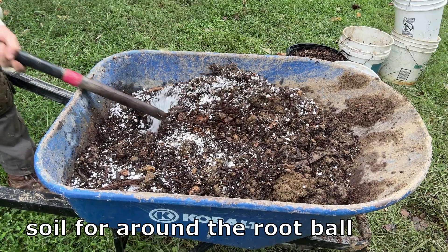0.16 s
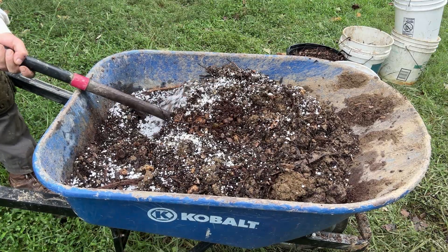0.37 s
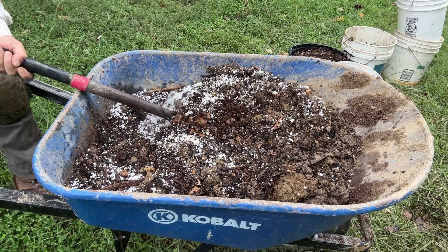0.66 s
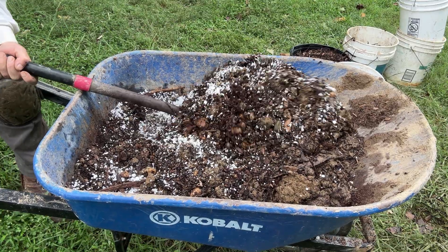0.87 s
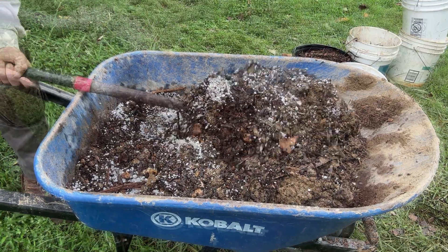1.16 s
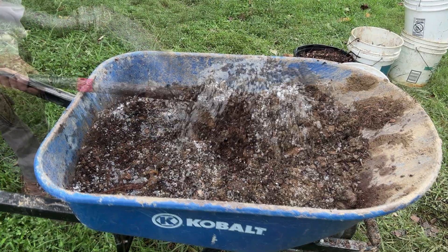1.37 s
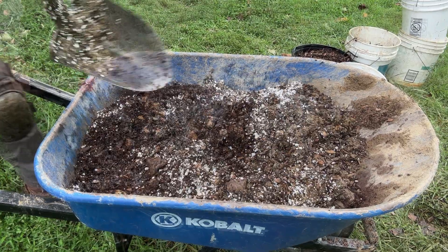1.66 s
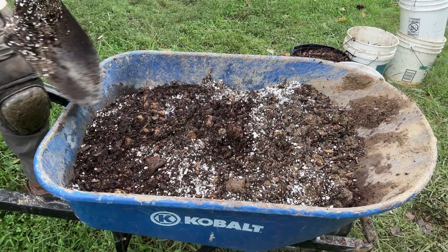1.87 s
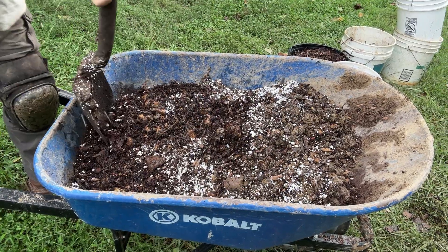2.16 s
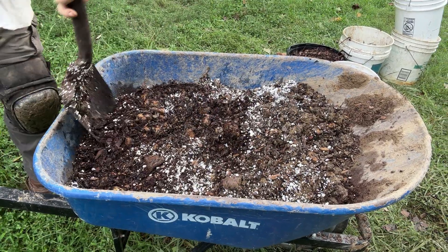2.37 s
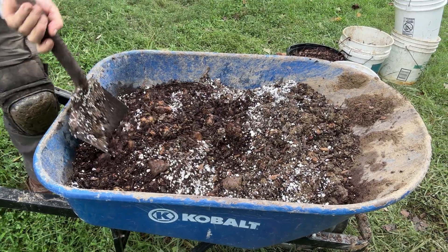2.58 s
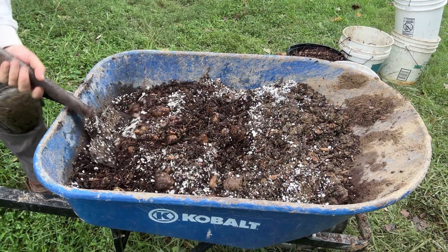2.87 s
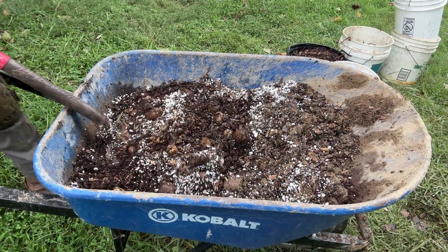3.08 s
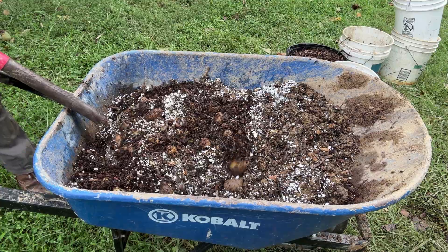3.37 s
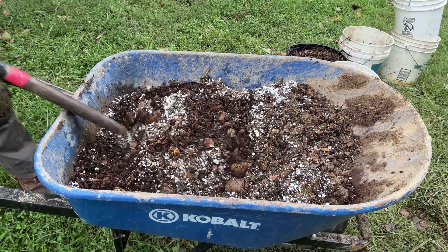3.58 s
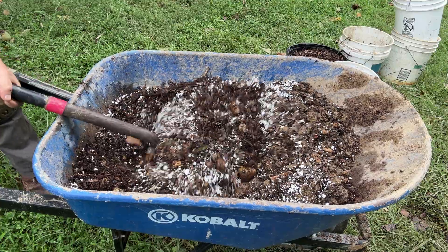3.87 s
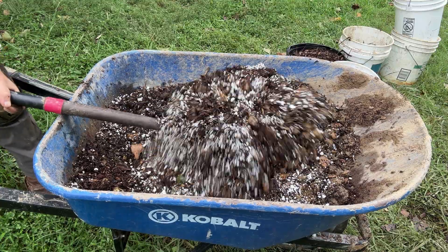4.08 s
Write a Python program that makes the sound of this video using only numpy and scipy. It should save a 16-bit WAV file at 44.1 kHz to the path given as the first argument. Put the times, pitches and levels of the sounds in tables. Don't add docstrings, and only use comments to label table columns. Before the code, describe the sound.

A steel shovel shoves gritty soil in a metal wheelbarrow, loud scrapes and stony clanks with dull tub thumps between quiet outdoor lulls.

```python
import sys
import numpy as np
from scipy import signal
from scipy.fft import rfft, irfft, next_fast_len
from scipy.io import wavfile
from scipy.ndimage import uniform_filter1d, map_coordinates

SR = 44100
rng = np.random.default_rng(int(sys.argv[2]) if len(sys.argv) > 2 else 0)


def boost_factor(decibels):
    exponent = np.asarray(decibels, float) / 20
    return 10 ** exponent


def wrap_up_sound(samples):
    columns = np.atleast_2d(samples).T
    tamed = np.clip(columns, -1, 1)
    steps = np.round(tamed * 32767).astype(np.int16)
    wavfile.write(sys.argv[1], SR, steps)


N = 185837

# (centre [Hz], width [Hz], level [dB])
BLADE_MODES = [(395, 65, -2), (549, 92, 0), (794, 173, -4), (1034, 126, -3), (1240, 246, -5),
               (1567, 204, -5), (1730, 93, -2), (1954, 410, -6.5), (2347, 540, -9), (3190, 670, -13.5),
               (3880, 350, -15)]
# (frequency [Hz], level [dB per Hz])
GRIT_COLOUR = [(1200, -1.5), (2200, -3.5), (4500, 2.5), (6200, 2), (8000, -1), (10300, -6.5), (12500, -1.5),
               (14500, -4), (16000, -18.5)]
# (time [s], centre [Hz], lift [dB])
CONTACT_PATH = [(0, 559, 5), (.15, 477, -11.5), (.3, 488, -8.5), (.7, 1326, -0.5), (1.45, 996, -0.5),
                (2.0, 1455, -1), (2.45, 1500, 2), (2.85, 1860, -1.5), (3.1, 1390, 6.5), (3.5, 1094, 7),
                (3.7, 1110, 5), (3.85, 1110, -4.5), (4.2, 1085, 1)]


def blade_motion():
    # (time [s], grit sliding [dB], load on the blade [dB])
    first_push = [
        (0.0, -31.5, -8.5),
        (0.054, -23.5, -16.5),
        (0.124, -39, -27.5),
        (0.18, -23, -19),
        (0.266, -47, -34.5),
        (0.34, -53, -56.5),
    ]
    lift = [
        (0.34, -50, -52),
        (0.48, -49, -63),
        (0.62, -48.5, -48),
        (0.818, -45.5, -39.5),
        (0.852, -46.5, -47),
        (1.12, -48, -44.5),
        (1.13, -47.5, -38),
        (1.398, -47.5, -40.5),
        (1.448, -47, -47.5),
    ]
    scoop = [
        (2.409, -51, -38),
        (2.417, -27, -21.5),
        (2.521, -32.5, -28),
        (2.603, -44.5, -32),
        (2.761, -34.5, -25),
        (2.809, -42, -28),
        (2.825, -27, -24.5),
        (2.981, -48, -27),
        (3.053, -52, -58),
    ]
    second_push = [
        (3.433, -66, -48),
        (3.445, -40, -34),
        (3.483, -48, -26.5),
        (3.545, -35, -26),
        (3.557, -50.5, -15.5),
        (3.65, -42.5, -24.5),
        (3.7, -34.5, -20),
        (3.76, -42, -27),
        (3.901, -48.5, -37.5),
    ]
    # (peak time [s], rise [s], hold [s], sliding [dB], load [dB])
    brushes = [(1.492, .04, 0.077, -48, -74), (1.6, .02, 0.023, -58, -59), (1.753, .09, 0.043, -61, -68),
               (1.966, 0.0092, 0.0022, -39, -22), (2.087, 0.054, 0.027, -34, -32.5),
               (2.152, .015, 0.0091, -53, -61), (2.302, 0.13, 0.035, -54, -58),
               (2.345, 0.012, 0.056, -41, -36.5), (3.078, .004, 0.07, -47.5, -37.5),
               (3.241, 0.078, 0.12, -51, -72), (3.424, .08, .02, -59, -47.5),
               (3.912, 0.037, 0.13, -45.5, -44.5), (4.038, .06, .12, -45.5, -45.5),
               (4.15, .008, .07, -43.5, -36)]
    rise_db, sag_db_per_s, release_db_per_s = 21, 31, 612
    rest_sliding_db, rest_load_db = -98, -64
    t = np.arange(N) / SR
    motion = np.outer((rest_sliding_db, rest_load_db), np.ones(N))
    for rows in (first_push, lift, scoop, second_push):
        inside = (t >= rows[0][0]) & (t <= rows[-1][0])
        motion = np.where(inside, curves([rows]), motion)
    for s, rise, hold, *peaks_db in brushes:
        sag_db = sag_db_per_s * np.clip(t - s, 0, hold)
        release_db = release_db_per_s * np.maximum(t - s - hold, 0)
        drop_db = rise_db * np.maximum(s - t, 0) / rise + sag_db + release_db
        motion = np.maximum(motion, np.array(peaks_db)[:, None] - drop_db)
    return motion


def stroke():
    # (centre [Hz], width [Hz], level [dB])
    tub_modes = [(141.5, 34, -4.5), (183, 48.5, -0.5), (236.4, 40, -3), (281, 43, -6.5), (358, 124, -15)]
    fine_db, rasp_db = blade_motion()
    coarse_db = -6.5 + fine_db + 0.49 * (rasp_db - fine_db)
    rumble_lag_s = 0.013
    keep = np.exp(-1 / (rumble_lag_s * SR))
    slow_load_db = rasp_db[0] + signal.lfilter([1 - keep], [1, -keep], rasp_db - rasp_db[0])
    rumble_db = -16 + 0.68 * slow_load_db

    clump = wobble(45)
    grit = patchy(grains(4000, spread_db=4.5, smooth=0.96), depth_db=2.0, shape=(12, 3))
    force = np.clip((coarse_db + 54) / 14, 0, 1)
    wash = np.std(grit) * rng.standard_normal((2, N))
    grit = force * grit + np.sqrt(1 - force ** 2) * wash
    hiss = boost_factor(fine_db) * unit(filtered(grit, bright)) + boost_factor(coarse_db + 1.5) * unit(filtered(grit, dull))

    crumbs = patchy(grains(1200, spread_db=2.5, smooth=1.0), depth_db=3.0, shape=(3, 9))
    rasp = favoured(unit(filtered(crumbs, body(BLADE_MODES))), octaves=0.7)
    rasp = rasp + boost_factor(-2) * pebbles(260, spread=0.825, cycles=4.9, spread_db=1.5)
    rumble = unit(filtered(rng.standard_normal((2, N)), body(tub_modes)))

    flutter = boost_factor(force * (1.3 * clump + 1.5 * wobble(130)))
    return flutter * hiss + boost_factor(rasp_db - 4.0 + 1.76 * clump) * rasp + boost_factor(rumble_db + 3.5) * rumble


def snaps():
    # (time [s], peak level [dB], share under 7 kHz [dB])
    bursts = [(0.042, 3, -36), (0.0926, -7.5, -16.5), (0.14, -13, -20), (0.174, -10.5, -2.5),
              (0.233, -17, -15), (1.17, -22, -35), (1.2459, -21, -12.5), (1.3086, -22.5, -16),
              (1.961, -3, -17.5), (2.083, -16, -9.5), (2.1223, -19.5, -29), (2.2228, -37, -27),
              (2.4144, -11.5, -6.5), (2.459, -14, -18), (2.6899, -18, -9), (2.8295, -14, -24),
              (3.08, -28, -9), (3.104, -14.5, -21), (3.1288, -18, -7), (3.1466, -22.5, -5.5),
              (3.3829, -28, -9.5), (3.4496, -14.5, -20), (3.5185, -12.5, -22), (3.5393, -8, -36),
              (3.5853, -13.5, -22), (3.6546, -19, -5.5), (3.677, -25, 4.5), (4.128, -20, -18.5),
              (4.1552, -26.5, 4), (4.1808, -10.5, -22)]
    decay_s, rise_s = 0.00265, 0.00059
    low, high, t = np.zeros((2, N)), np.zeros((2, N)), np.arange(SR // 12) / SR
    shape = np.exp(-t / decay_s) * (1 - np.exp(-t / rise_s))
    for s, db, dull_db in bursts:
        puff = rng.standard_normal((2, 2, len(t))) * shape
        add(high, s, boost_factor(db + 1.5) * puff[0])
        add(low, s, boost_factor(db + dull_db + 10.5) * puff[1])
    return filtered(low, dull) + filtered(high, bright)


def knocks():
    # (time [s], peak level [dB], pitch [Hz])
    stones = [(0.003, -6.5, 1150), (0.029, -9, 1287), (0.048, -4, 880), (0.131, -15, 950),
              (0.174, -14, 1060), (0.187, -11, 1100), (1.25, -26, 1910), (1.963, -17.5, 1580),
              (2.105, -22, 1605), (2.415, -18, 1320), (2.459, -14.5, 1240), (2.688, -11, 2080),
              (2.829, -13.5, 1800), (3.08, -15, 1220), (3.103, -17, 1160), (3.129, -17, 1030),
              (3.45, -9.5, 1383), (3.484, -16, 990), (3.511, -14.5, 1040), (3.555, -5.5, 1150),
              (3.564, -2, 1266), (3.588, -12.5, 1240), (3.656, -5.5, 1224), (3.661, 1, 1260),
              (3.68, -2, 696), (3.703, -2.5, 1240), (3.743, -9, 760), (3.798, -17.5, 1420),
              (3.966, -28.5, 980), (4.155, -23, 1030)]
    # (time [s], peak level [dB], pitch [Hz])
    clods = [(0.001, -5.5, 554), (0.015, -11, 576), (0.043, -15, 510), (0.067, -6.5, 306),
             (0.189, -11, 365), (1.126, -25, 746), (2.348, -30, 596), (2.567, -19, 482), (2.819, -25, 600),
             (2.895, -14.5, 304), (3.088, -19, 800), (3.147, -27.5, 794)]
    # (time [s], peak level [dB], pitch [Hz])
    chips = [
        (0.0074, -14, 3840),
        (2.4558, -9.5, 6280),
        (3.6561, -1, 3880),
        (3.678, -1.5, 3880),
    ]
    ring, puff, t = np.zeros((2, N)), np.zeros((2, N)), np.arange(SR // 10) / SR
    quarter_turn = [[0], [np.pi / 2]]
    for rows, length_ms in ((stones, 2.66), (clods, 5.7), (chips, 4)):
        for s, db, hz in rows:
            chance = rng.standard_normal((3, len(t)))
            drift = np.cumsum(chance[0]) * 0.076
            cycles = np.sin(2 * np.pi * hz * t + drift + quarter_turn)
            add(ring, s, boost_factor(db - 4.5) * swell(t, 0.61 * length_ms) * cycles)
            if hz < 2500:
                add(puff, s, boost_factor(db + 5.5) * swell(t, 0.38 * length_ms) * chance[1:])
    return ring + favoured(filtered(puff, body(BLADE_MODES)), octaves=1.0)


def thumps():
    # (time [s], peak level [dB], pitch [Hz])
    blows = [(0.01, -8.5, 215), (0.075, -5.5, 201.4), (0.094, -9.5, 186), (0.119, -10.5, 279),
             (0.132, -4, 192), (0.154, -3.5, 192), (0.173, -9.5, 182), (0.23, -14, 139),
             (0.256, -18.5, 215), (0.276, -38, 226), (1.14, -26, 179), (1.969, -8, 159),
             (1.991, -19.5, 212), (2.349, -12, 172), (2.418, -19, 165), (2.564, -35, 152),
             (2.688, -19.5, 198), (2.747, -20.5, 200), (2.894, -9, 169), (2.961, -21.5, 181),
             (2.979, -22.5, 199), (3.089, -15.5, 185), (3.415, -29.5, 228), (3.452, -12, 195),
             (3.535, -15, 230), (3.681, -6, 192.5), (3.719, -17.5, 167), (3.819, -17, 162),
             (3.844, -11.5, 146), (3.963, -31.5, 193)]
    boom, t = np.zeros((2, N)), np.arange(SR // 5) / SR
    shape = swell(t, 7.93) ** 1.95
    for s, db, hz in blows:
        neighbour = np.sin(2 * np.pi * 1.456 * hz * t + rng.uniform(0, 2 * np.pi))
        cycles = np.sin(2 * np.pi * hz * t) + 0.41 * neighbour
        add(boom, s - .001, boost_factor(db - 1.6) * shape * cycles * [[1], [0]])
    return boom


def dull(hz):
    return colour(GRIT_COLOUR)(hz) / np.sqrt(1 + (hz / 7000) ** 8)


def bright(hz):
    return colour(GRIT_COLOUR)(hz) / np.sqrt(1 + (7500 / (hz + 1)) ** 8)


def pebbles(per_s, spread, cycles, spread_db):
    draw = rng.random((round(per_s * N / SR), 4))
    start = (draw[:, :1] * N).astype(int)
    s, centre_hz, _ = np.transpose(CONTACT_PATH)
    hz = np.interp(start / SR, s, centre_hz) * np.exp(spread * (draw[:, 1:2] + draw[:, 2:3] - .9))
    size = boost_factor(spread_db * np.minimum(-np.log(draw[:, 3:] + 1e-9), 2.5))
    k = np.arange(SR // 40)
    turns = hz * k / SR
    life = size * np.exp(-turns / cycles) * (1 - np.exp(-turns / 0.5))
    rows = [life * np.sin(2 * np.pi * turns), life * np.cos(2 * np.pi * turns)]
    places = (start + k).ravel()
    return unit(np.array([np.bincount(places, r.ravel(), N + len(k))[:N] for r in rows]))


def grains(per_s, spread_db, smooth):
    hit = rng.random(N) < per_s / SR
    size = hit * boost_factor(spread_db * np.minimum(rng.exponential(1, N), 2.5))
    return unit(size * rng.standard_normal((2, N))) + smooth * rng.standard_normal((2, N))


def patchy(x, depth_db, shape):
    z = signal.stft(x, nperseg=256)[2]
    field = uniform_filter1d(rng.standard_normal(z.shape[1:]), shape[0], axis=0)
    field = uniform_filter1d(field, shape[1], axis=1)
    return signal.istft(z * boost_factor(depth_db * unit(field)), nperseg=256)[1][:, :N]


def favoured(x, octaves):
    hz, t, z = signal.stft(x, SR, nperseg=512)
    s, centre_hz, lift_db = np.transpose(CONTACT_PATH)
    away = np.log2((hz[:, None] + 1) / np.interp(t, s, centre_hz)) / octaves
    gain_db = np.interp(t, s, lift_db) * (np.exp(-away ** 2) - .6)
    return signal.istft(z * boost_factor(gain_db), SR, nperseg=512)[1][:, :N]


def garden():
    # (time [s], level [dB])
    traffic_level = [
        [(0.0, -41), (0.43, -41), (0.75, -40.5), (1.448, -40)],
        [(1.45, -44.5), (2.2, -43.5), (2.6, -41), (3.35, -42.5), (3.73, -39), (4.21, -41.5)],
    ]
    # (frequency [Hz], level [dB per Hz])
    traffic_colour = [(20, -53), (45, -2.5), (100, 6), (170, -9.5), (300, -17.5), (900, -15), (1400, -26),
                      (2200, -30.5), (4500, -44.5), (10500, -41), (13000, -34), (16000, -32.5)]
    # (frequency [Hz], level [dB per Hz])
    insect_colour = [(4700, -21), (5500, -3), (6300, 2.5), (6800, -7), (7800, -5.5)]
    far_db, = curves(traffic_level)
    traffic = unit(filtered(rng.standard_normal((2, N)), colour(traffic_colour)))
    traffic = boost_factor(far_db + 2.0 + 0.64 * wobble(5.89)) * traffic
    insects = unit(filtered(rng.standard_normal((2, N)), colour(insect_colour + [(9000, -60)])))
    insects = boost_factor(-57.5 + 2.1 * wobble(3.72) + 1.3 * wobble(56)) * insects
    return traffic + insects


def ports(pair, alike):
    # (frequency [Hz], phase [rad])
    lead = [(300, 0), (750, .5), (1600, .15), (2500, 1.3), (4500, 2.1), (7700, np.pi), (10000, 4.65),
            (13200, 2 * np.pi)]
    # (frequency [Hz], level [dB])
    lean = [(60, -3.0), (110, -3.0), (200, -3.5), (380, -3.5), (700, -1.0), (1290, -0.5), (2380, -2.0),
            (4400, -2.0), (8120, 2.0), (15000, 0.0)]
    turn = lambda hz: np.arccos(np.clip(along(alike, hz), 0, 1)) / 2
    same, other = filtered(pair, lambda hz: np.array([np.cos(turn(hz)), np.sin(turn(hz))]))
    half = lambda hz: boost_factor(along(lean, hz) / 2) * np.exp(.5j * along(lead, hz))
    return filtered(np.array([same + other, same - other]), lambda hz: np.array([half(hz), 1 / half(hz)]))


def unit(x):
    return x / np.sqrt(np.mean(x ** 2) + 1e-20)


def along(points, hz):
    f, v = np.transpose(points)
    return np.interp(np.log(hz + 1), np.log(f + 1), v)


def curves(tables):
    s, *cols = np.vstack(tables).T
    return [np.interp(np.arange(N) / SR, s, c) for c in cols]


def wobble(rate):
    knots = rng.standard_normal(int(N * rate / SR) + 4)
    return map_coordinates(knots, [np.arange(N) * rate / SR])


def filtered(x, response):
    m = next_fast_len(N + SR // 2)
    return irfft(rfft(x, m) * response(np.fft.rfftfreq(m, 1 / SR)), m)[..., :N]


def colour(spectrum):
    return lambda hz: boost_factor(along(spectrum, hz))


def body(modes):
    def response(f):
        total = 0
        for k, (centre, width, db) in enumerate(modes):
            damping = 1j * f * width
            total = total + (-1) ** k * boost_factor(db) * damping / (centre * centre - f * f + damping)
        return total
    return response


def add(track, s, burst):
    part = track[:, round(s * SR):][:, :burst.shape[1]]
    part += burst[:, :part.shape[1]]


def swell(t, ms):
    u = t / (ms / 1000)
    return u * np.exp(1 - u)


def scene():
    # (frequency [Hz], likeness [0-1])
    near_alike = [(150, .995), (300, .87), (1400, .94), (2200, .62), (6600, .45), (7600, .94), (10000, .87),
                  (13000, .97)]
    # (frequency [Hz], likeness [0-1])
    far_alike = [(110, 0.97), (250, 0.5), (500, 0.05), (1400, 0.057), (2200, 0.093), (6600, 0.17),
                 (7500, 0.47), (10000, 0.88), (13000, 0.86)]
    shovel = stroke() + snaps() + knocks() + thumps()
    return ports(shovel, near_alike) + ports(garden(), far_alike)


def top_cut(x):
    return signal.sosfilt(signal.butter(12, 16540, fs=SR, output="sos"), x)


def record(dry):
    change_s, fade_in_s, top_hz = 1.4495, 0.03, 15950
    since = np.arange(N) / SR - change_s
    fade = np.where(since < 0, 1, np.clip(0.088 + since / fade_in_s, 0, 1))
    x = filtered(dry * fade, lambda hz: 1 / np.sqrt(1 + (hz / top_hz) ** 120))
    x = x / (1 + np.abs(x / .95) ** 6) ** (1 / 6)
    return top_cut(x)


dry = scene()
out = record(dry)
wrap_up_sound(out)
```